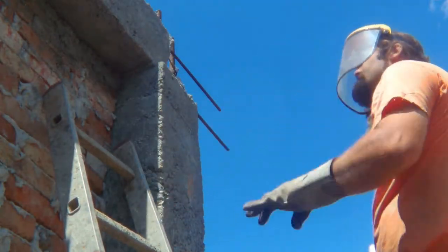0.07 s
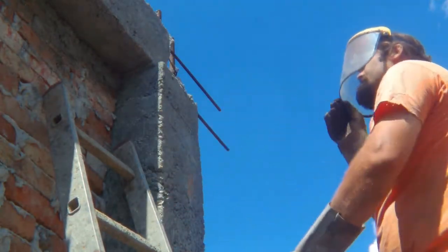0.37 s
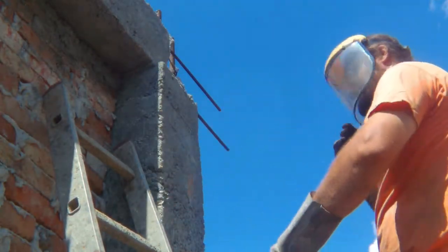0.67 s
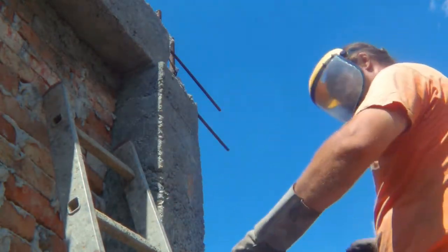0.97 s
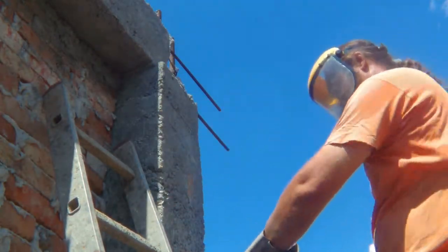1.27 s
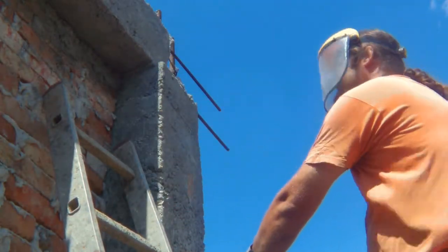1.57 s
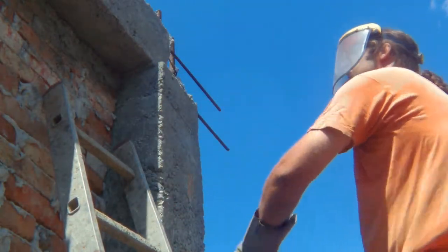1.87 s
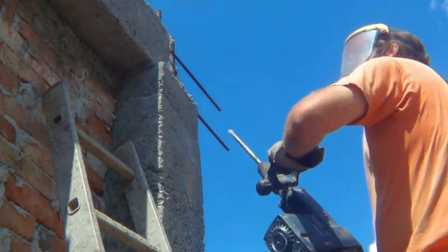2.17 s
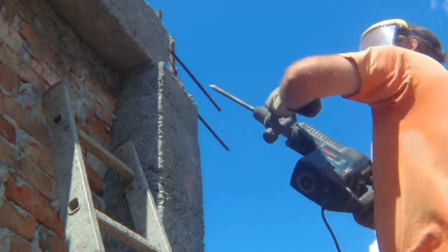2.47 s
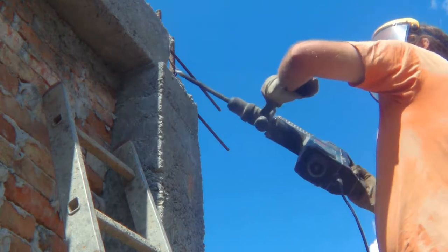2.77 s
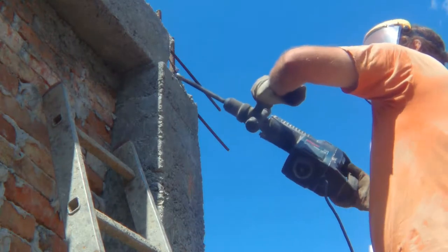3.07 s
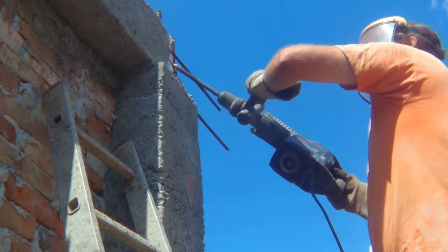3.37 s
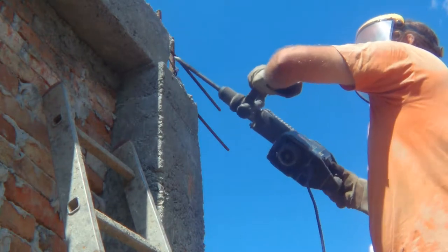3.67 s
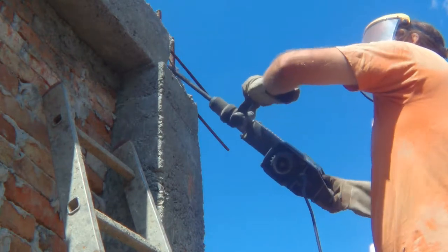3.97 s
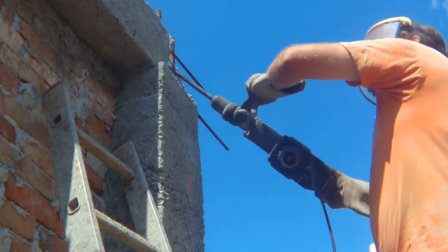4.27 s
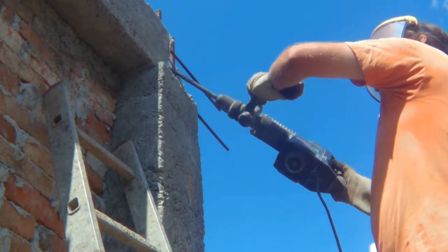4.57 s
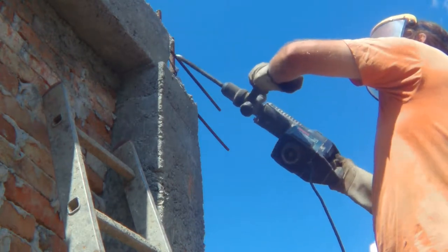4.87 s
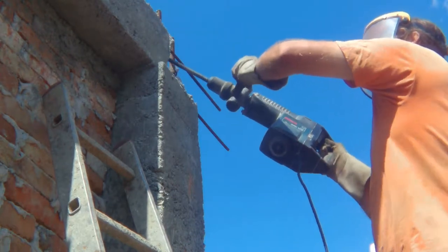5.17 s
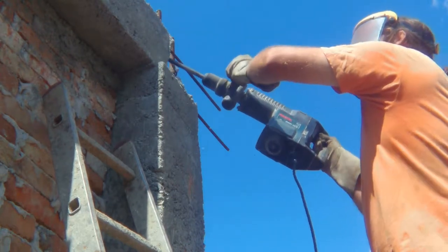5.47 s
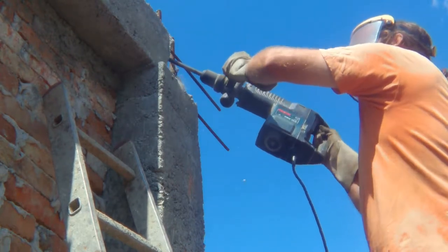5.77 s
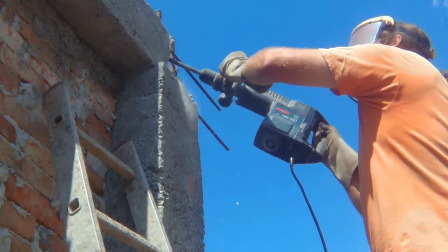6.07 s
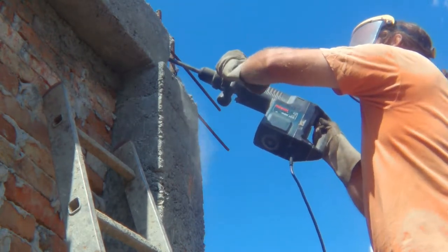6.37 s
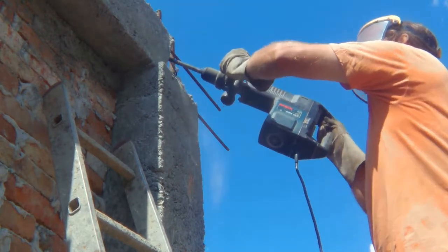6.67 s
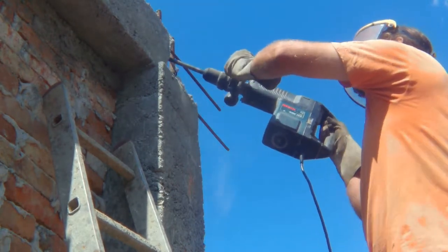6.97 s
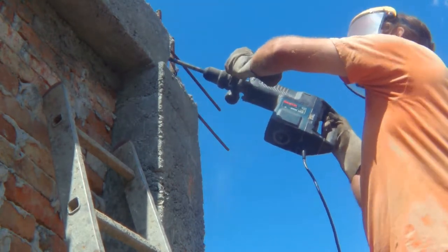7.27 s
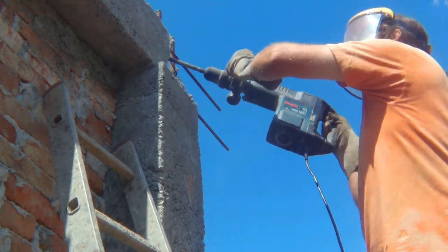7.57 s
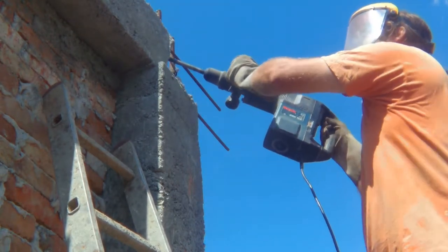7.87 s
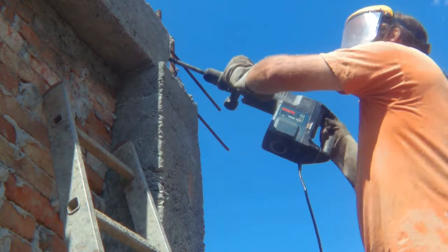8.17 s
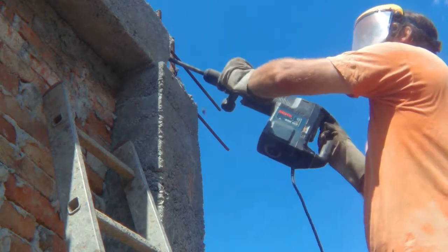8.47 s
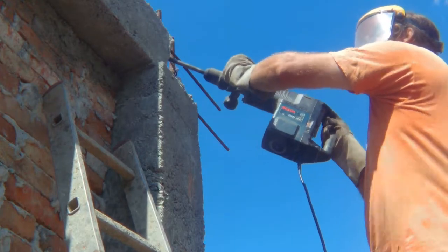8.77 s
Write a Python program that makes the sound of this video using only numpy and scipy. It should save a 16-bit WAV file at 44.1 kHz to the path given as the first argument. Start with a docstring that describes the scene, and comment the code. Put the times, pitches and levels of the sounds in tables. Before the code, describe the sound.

Outdoors, a faint distant machine hums and small birds chirp softly. Clothing rustles and a heavy tool gives hollow knocks and light clinks as it is lifted into place. An electric demolition hammer then runs up with a gear whine and pounds concrete in loud, stuttering bouts that slap off nearby walls. It goes on whirring with a few taps and a last steel skid, heard close and centred.

```python
"""An electric demolition hammer pounds a concrete lintel, worked from a scaffold.
Cloth rustles and the tool knocks and clinks as it is lifted and set. The motor runs up, gears whining,
and the striker hits the chisel in bouts, about 32 blows a second; then the tool idles with a few taps.
Nearby walls throw the blows back and a gain control ducks under them.
Behind it all, a far machine hums and small birds chirp in the open air."""
import sys
import numpy as np
from scipy import signal
from scipy.io import wavfile
from scipy.ndimage import uniform_filter1d

SR = 44100
rng = np.random.default_rng(int(sys.argv[2]) if len(sys.argv) > 2 else 0)


def inscribe(sig):
    """Save sig as 16-bit PCM at rate SR to the path in sys.argv[1].

    A 1-D sig is mono; a 2-D sig holds one channel per row.
    Samples are clipped to [-1, 1] before scaling.
    """
    pcm = np.round(np.clip(np.atleast_2d(sig).T, -1, 1) * 32767)
    wavfile.write(sys.argv[1], SR, pcm.astype(np.int16))


N = 393813
TIME = np.arange(N) / SR
MOTOR_START_S, SHAFT_TOP_HZ = 4.525, 274.0
PINION_TEETH, CRANK_TEETH = 7, 60


def amp(db):
    """Decibels to gain."""
    return 10 ** (np.asarray(db) / 20)


def unit_rms(x):
    """Scales to rms 1."""
    return x / np.sqrt(np.mean(x ** 2) + 1e-20)


def unit_peak(x):
    """Scales to peak 1."""
    return x / (abs(x).max() + 1e-20)


def add(mix, start_s, sound):
    """Mixes a sound in at a time."""
    part = mix[round(start_s * SR):][:len(sound)]
    part += sound[:len(part)]


def colour(x, curve, size=4096):
    """Minimum-phase EQ along a curve of (frequency [Hz], gain [dB])."""
    hz, db = np.transpose(curve)
    bins_hz = abs(np.fft.fftfreq(size, 1 / SR))
    log_gain = np.log(amp(np.interp(np.log(bins_hz + 1), np.log(hz), db)))
    taps = np.fft.ifft(np.exp(np.conj(signal.hilbert(log_gain)))).real[:size // 2]
    return signal.oaconvolve(x, taps)[:len(x)]


def drift(per_s):
    """Smooth random modulation of rms 1."""
    knots = np.arange(int(TIME[-1] * per_s) + 2)
    return unit_rms(np.interp(TIME * per_s, knots, rng.standard_normal(len(knots))))


def noise(curve, grain_db=0):
    """Coloured noise of rms 1, roughened by an optional level modulation."""
    return unit_rms(colour(rng.standard_normal(N) * amp(grain_db), curve))


def ring(t, hz, t60):
    """One dying mode."""
    return np.sin(2 * np.pi * hz * t) * np.exp(-np.log(1000) * t / t60)


def ring_modes(t, modes):
    """A set of modes struck together."""
    return sum(amp(db) * ring(t, hz, t60) for hz, db, t60 in modes)


def burst(t, swell_s):
    """A cluster of tiny contacts that swells and dies away."""
    return rng.standard_normal(len(t)) * t / swell_s * np.exp(1 - t / swell_s)


def reverb(x, wet_db, t60, reflections=600):
    """Adds the scattered reflections of scaffold and walls."""
    t = np.arange(SR // 2) / SR
    taps = np.zeros(len(t))
    taps[rng.integers(SR // 200, len(t), reflections)] = rng.choice([-1., 1.], reflections)
    taps *= np.exp(-np.log(1000) * t / t60)
    return x + amp(wet_db) * signal.oaconvolve(x, taps / np.linalg.norm(taps))[:N]


# dark outdoor bed: (frequency [Hz], gain [dB])
OPEN_AIR_EQ = [(15, -41), (25, -3), (44, -7.5), (257, -6.5), (318, -5), (344, -11.5), (438, -10.5),
               (475, -7.5), (515, -12.5), (621, -4), (769, -9), (879, -16), (952, -13.5), (1420, -22.5),
               (15000, -45.5)]
def open_air(level_db=-53.5):
    """A soft, gently breathing wash of outdoor air."""
    return noise(OPEN_AIR_EQ) * amp(level_db + 0.5 * drift(5.13))


# partials of the distant drone: (frequency [Hz], level [dB])
FAR_PARTIALS = [(316.5, -58.5), (473.7, -61), (631, -74), (790, -62), (947.5, -65.5)]
def far_machine():
    """A far machine hums, its partials wavering in pitch together."""
    clock = np.cumsum(1 + 0.00301 * drift(4.6)) / SR
    return sum(amp(db + drift(4.24)) * np.sin(2 * np.pi * hz * clock) for hz, db in FAR_PARTIALS)


# bird calls: (time [s], level [dB], pitch [Hz])
BIRD_CUES = [(.55, -70, 4670), (.86, -70, 4270), (1.72, -68, 4600), (1.79, -69, 4300), (2.06, -70, 4650),
             (2.45, -66, 4700), (3.09, -62, 4570), (3.79, -67, 4670), (3.91, -69, 6400)]
def birds(chirp_s=0.053, glide=0.03, roughness=0.2):
    """Small birds give faint, breathy chirps that glide up or down."""
    out = np.zeros(N)
    progress = np.arange(0, 1, 1 / (chirp_s * SR))
    for start, db, hz in BIRD_CUES:
        bend = glide * rng.standard_normal() * (.5 - progress)
        pitch = hz * (1 + bend + roughness * rng.standard_normal(len(progress)))
        tone = np.sin(2 * np.pi * np.cumsum(pitch) / SR)
        add(out, start, amp(db) * np.sin(np.pi * progress) * tone)
    return out


# the worker lifts the tool, then sets it: (time [s], length [s], level [dB])
MOVE_CUES = [(1.57, 1.76, -51), (3.812, 0.93, -50)]
# muffled cloth: (frequency [Hz], gain [dB])
CLOTH_EQ = [(15, -26.5), (50, 12.5), (90, -19.5), (250, -5.5), (450, 3), (680, 6), (900, -2), (1400, -16),
            (2300, -17), (3200, -24.5), (7500, -29.5), (10000, -42), (15000, -38)]
def rustle(ramp_s=0.12, grain_db=2.0):
    """Clothes and gloves rub in uneven patches during each move."""
    envelope = sum(amp(db) * np.clip(np.minimum(TIME - start, start + length - TIME) / ramp_s, 0, 1)
                   for start, length, db in MOVE_CUES)
    return envelope * noise(CLOTH_EQ, grain_db * drift(70))


# handling bumps before the start, louder taps in the gearbox rattle while idling:
# (time [s], level [dB], pitch [Hz], brightness [dB], contact time [s])
KNOCK_CUES = [(1.6225, -18.5, 685, -2, 0.00045), (1.6255, -21, 660, -4.5, 0.0029),
              (1.640, -26.5, 379, 3, 0.0037), (1.795, -41, 675, 5, .0018), (1.914, -32, 656, 13, 0.016),
              (1.932, -28, 686, -9, 0.0066), (2.1037, -25, 633, 2, 0.002), (2.402, -34, 530, 5, 0.008),
              (2.432, -38, 720, 3, 0.01), (2.474, -39, 560, 2, 0.0071), (2.698, -38.5, 640, -14, 0.0025),
              (2.870, -31, 687, 13, 0.0055), (2.886, -34.5, 730, 4, 0.0094), (3.046, -34, 666, -8, 0.011),
              (3.070, -28.5, 687, -7, 0.007), (3.3635, -23.5, 636, -6.5, 0.0035),
              (3.919, -35.5, 675, -5, 0.0011), (3.9423, -23.5, 780, 0, 0.0029),
              (4.063, -34, 720, -20, 0.0013), (4.313, -26, 690, -4.5, 0.0045),
              (4.391, -33.5, 630, -5, 0.0022), (4.4427, -5, 650, 7, 0.0038),
              (7.8325, -8.5, 710, -10, 0.0013), (8.0855, -7, 720, -8, 0.00082),
              (8.400, -16, 720, -11, 0.0018)]
# boxy scuff of each knock: (frequency [Hz], gain [dB])
SCUFF_EQ = [(100, -41), (230, -23), (350, -10.5), (450, -9.5), (600, 11.5), (950, 6.5), (1250, -2),
            (1500, -5.5), (1750, -9.5), (2300, -11), (3000, -22.5), (5000, -33.5), (7800, -35), (9000, -58),
            (15000, -54)]
def knocks(scuff_db=-3, shell_db=-5, shell_ratio=2.115):
    """Short hollow knocks, each with a scuff; hard ones ring an overtone of the tool's shell."""
    t, out = np.arange(SR // 3) / SR, np.zeros(N)
    for start, db, hz, bright_db, contact_s in KNOCK_CUES:
        hollow = ring(t, hz * .92, 0.023 + 6 * contact_s) + ring(t, hz * 1.09, 0.021 + 6 * contact_s)
        hollow = unit_peak(hollow * (1 - np.exp(-t / contact_s)))
        scuff = amp(scuff_db + bright_db) * unit_peak(colour(burst(t, contact_s), SCUFF_EQ))
        hardness = np.exp(-contact_s / 0.0021)
        shell = hardness * amp(shell_db + min(bright_db, 0)) * ring(t, hz * shell_ratio, t60=0.024)
        add(out, start, amp(db) * unit_peak(hollow + shell + scuff))
    return reverb(out, wet_db=-8.5, t60=0.24)


# low end of a footstep: (time [s], level [dB], pitch [Hz], t60 [s])
PLANK_CUES = [(1.657, -30.5, 59.4, 0.21), (1.662, -36.5, 41, 0.27)]
def plank():
    """The scaffold plank gives under a step with a deep thud."""
    t, out = np.arange(SR // 3) / SR, np.zeros(N)
    for start, db, hz, t60 in PLANK_CUES:
        add(out, start, amp(db) * ring(t, hz, t60))
    return out


# ring of the free chisel, in clinks and skids: (frequency [Hz], level [dB], t60 [s])
CHISEL_MODES = [(1540, -23, .04), (1860, -20, .035), (2317, -12, .035), (2590, -22, .03), (4440, -30, 0.05),
                (5550, -26, .035), (6580, -27, .04)]
# the chisel shifts: (time [s], clink level [dB], scrape level [dB], scrape swell [s])
CLINK_CUES = [(1.912, -40, -53, 0.024), (2.869, -34, -55.5, 0.011)]
# thin steel scrape: (frequency [Hz], gain [dB])
SCRAPE_EQ = [(800, -29), (2200, 4), (3000, -14), (4300, -3), (7700, -4.5), (8600, -12), (15000, -25)]
def clinks(scrape_trim_db=-0.5):
    """The loose chisel clinks and scrapes in its holder."""
    t, out = np.arange(SR // 3) / SR, np.zeros(N)
    steel = ring_modes(t, CHISEL_MODES)
    for start, clink_db, scrape_db, swell_s in CLINK_CUES:
        scrape = colour(burst(t, swell_s), SCRAPE_EQ)
        add(out, start, amp(clink_db) * steel + amp(scrape_db + scrape_trim_db) * scrape)
    return out


# start-up growl: (frequency [Hz], gain [dB])
SURGE_EQ = [(100, -56), (330, -13), (550, -4.5), (720, 7.5), (850, -0.5), (1100, -13), (2100, -33),
            (3300, -35), (4000, -37), (4250, -24), (4700, -54), (12000, -61)]
def surge(age, level_db=-22.5, peak_s=0.1, width_s=0.11):
    """The starting torque grinds the gears and sparks the brushes."""
    return noise(SURGE_EQ) * amp(level_db) * np.exp(-((age - peak_s) / width_s) ** 2)


# gear and fan partials: (frequency [x shaft speed], level [dB])
WHINE_PARTIALS = [(7, -35), (14, -44.5), (14.77, -66), (17, -47.5)]
# what the housing lets through: (frequency [Hz], gain [dB])
HOUSING_EQ = [(600, -23), (1200, -2.5), (1600, -4.5), (1900, 2), (2400, 6.5), (2900, -4), (4100, -0.5),
              (4800, -17), (9000, -28)]
def gear_whine(shaft_phase, pace, load, backlash_rad=0.14, chatter_rad=.6, strain=4.0):
    """The gears whine, roughened by play between the teeth, hardest while speeding up the piston."""
    play = backlash_rad + chatter_rad * (1 - pace)
    whine = sum(amp(db + 0.79 * drift(40)) * np.sin(multiple * shaft_phase + play * drift(400))
                for multiple, db in WHINE_PARTIALS)
    return colour(whine * load, HOUSING_EQ) * (1 + strain * pace * (1 - pace)) * pace


def crank_noise(turns, repeat_share):
    """Loose parts and tooth flaws: noise of which a share comes round on every crank turn."""
    flaws = rng.standard_normal(SR // 32)
    looped = flaws[(turns % 1 * len(flaws)).astype(int)]
    return np.sqrt(repeat_share) * looped + np.sqrt(1 - repeat_share) * rng.standard_normal(N)


# midrange gearbox rattle: (frequency [Hz], gain [dB])
RATTLE_EQ = [(12, -50), (30, -13.5), (90, -33), (150, -21), (220, -24.5), (290, -13), (360, -16),
             (460, -2.5), (600, -1), (780, 3), (850, 1), (940, -6.5), (1150, -15), (1600, -19.5),
             (3000, -56.5)]
# biting gear rasp: (frequency [Hz], gain [dB])
RASP_EQ = [(700, -47), (1200, -13.5), (1700, -2.5), (1900, 5), (2200, 2), (2620, -1), (2850, -9),
           (3550, -10.5), (3720, -9), (4040, -1), (4370, -3.5), (4600, -14), (5500, -24), (9000, -29.5),
           (13800, -40), (15500, -53)]
def gear_noise(turns, pace, load, throb_db, rattle_db=-21, rasp_db=-30.5, grain_db=1.5):
    """The gearbox rattles and the teeth rasp, growing with speed and throbbing with the crank."""
    running = pace > 0
    rattle = crank_noise(turns, repeat_share=0.23) * amp(throb_db + grain_db * drift(500))
    rattle = colour(running * rattle, RATTLE_EQ)
    rasp = crank_noise(turns, repeat_share=0.32) * load * amp(grain_db * drift(400))
    rasp = colour(running * rasp, RASP_EQ)
    return (rattle / rattle[running].std() * amp(rattle_db) * pace ** 1.5
            + rasp / rasp[running].std() * amp(rasp_db) * pace ** 1.54)


# bright fan hiss: (frequency [Hz], gain [dB])
FAN_EQ = [(2500, -6), (4800, -1.5), (5400, -1.5), (6000, -4), (6600, -1.5), (7100, 3), (7800, -0.5),
          (8400, -6.5), (9500, -13), (12000, -9), (12700, -33), (14200, -77), (15500, -56)]
def fan(pace, dip_db, level_db=-39.5):
    """Fluttering fan air rises steeply with speed."""
    air = noise(FAN_EQ, 0.66 * dip_db + 0.9 * drift(300) + 0.5 * drift(5))
    return air / air[pace > 0].std() * amp(level_db) * pace ** 3.5


# low motor tones: (frequency [x shaft speed], level [dB])
HUM_PARTIALS = [(0.1168, -55), (1, -41), (1.817, -36.5), (2, -32.5), (2.63, -31.5), (4, -39)]
def motor_hum(shaft_phase, pace):
    """Low tones follow the shaft and fill in as it nears full speed."""
    return pace ** 4 * sum(amp(db + 1.6 * drift(13)) * np.sin(multiple * shaft_phase)
                           for multiple, db in HUM_PARTIALS)


# the piston's two strokes: (position [turns], width [turns], gear boost [dB], rattle boost [dB])
PISTON_STROKES = [(0.66, 0.14, 4.5, 1.5), (.09, 0.13, 1, 3.5)]
# the gear rasp, whine and fan thin out while the striker works: (time [s], level [dB])
MOTOR_DIP = [(5.55, 1), (5.9, -2.5), (6.25, -5.5), (6.64, -7.5), (6.72, 0)]
def motor(run_up_s=.53, waver=0.0008, sag=0.013):
    """The motor runs up, fast at first, to its governed speed; the piston loads it twice a turn."""
    age = np.maximum(TIME - MOTOR_START_S, 0)
    pace = np.minimum(age / run_up_s, 1) ** .55  # share of full speed
    shaft_hz = SHAFT_TOP_HZ * pace * (1 + waver * drift(12))
    turns = np.cumsum(shaft_hz) / SR * PINION_TEETH / CRANK_TEETH
    turns -= np.interp(BOUT_CUES[-1][0], TIME, turns)  # the last blow ends a crank turn
    ripple = sag * (np.cos(2 * np.pi * turns) + np.cos(4 * np.pi * turns + 1))
    shaft_phase = 2 * np.pi * np.cumsum(shaft_hz * (1 + ripple)) / SR
    gear_db, throb_db = np.zeros((2, N))
    for position, width, gear_boost, rattle_boost in PISTON_STROKES:
        offset = (turns - position + .5) % 1 - .5
        stroke = np.exp(-(offset / width) ** 2)
        gear_db += gear_boost * stroke
        throb_db += rattle_boost * stroke
    dip_db = np.interp(TIME, *np.transpose(MOTOR_DIP))
    load = unit_rms(amp(gear_db)) * amp(dip_db)
    tones = motor_hum(shaft_phase, pace) + gear_whine(shaft_phase, pace, load)
    noises = gear_noise(turns, pace, load, throb_db) + fan(pace, dip_db) + surge(age)
    attack = np.minimum(age / 0.0059, 1)
    return attack * (tones + noises)


# whining peak near 2 kHz with hiss above it: (frequency [Hz], gain [dB])
ROUGH_WHINE_EQ = [(500, -47), (1500, -1), (2050, 6), (2600, -10), (3100, -15), (4200, -2), (5500, -21),
                  (6500, -8), (7600, 0), (8400, -10), (9300, -21), (11800, -24), (13000, -28), (15500, -50)]
def rough_whine(start_s=5.285, level_db=-26, rise_s=0.0072, fade_db_per_s=32, grain_db=3):
    """A rough gear whine with a gritty hiss, fading through the first blows."""
    age = np.maximum(TIME - start_s, 0)
    envelope = np.minimum(age / rise_s, 1) * amp(level_db - fade_db_per_s * age)
    return envelope * noise(ROUGH_WHINE_EQ, grain_db * drift(500))


# runs of blows: (time [s], length [s], level [dB], relative ping [dB], relative thud [dB])
BOUT_CUES = [(5.3016, .015, -6, -4, -7), (5.3324, .015, 5.5, -10, -31), (5.396, .015, 1, -13, 4),
             (5.4280, .047, 6, -16, -6), (5.514, .015, 5.5, -13.5, -12), (5.52, .015, -2.5, -9.5, -10),
             (5.585, .047, 8.5, -23, -15), (5.6464, .047, 6.5, -25.5, -19), (5.7064, .015, 3, -20, -9),
             (5.7596, .015, -10.5, -24, 11), (5.8005, .015, 11.5, -19.5, -23), (5.8325, .015, 6, -18, -13),
             (5.873, .015, 3.5, -29, -12), (5.918, .015, -6, -24, -15), (5.9603, .047, 9.5, -22, -32),
             (6.023, .047, 6, -24, -22), (6.0893, .015, 0.5, -29, -13), (6.1168, .047, 9, -25, -20),
             (6.178, .047, 5.5, -23.5, -12.5), (6.3031, .2, 8, -24, -23), (6.521, .015, 2, -21, -10),
             (6.5502, .015, 6, -20.5, -14), (6.617, .015, 6.5, -21.5, -15)]
def strikes(jitter_s=0.00028, fade_db_per_s=5, scatter_db=.5):
    """The striker catches in bouts: one blow a crank turn, fading slightly through each bout."""
    turn_s = CRANK_TEETH / PINION_TEETH / SHAFT_TOP_HZ
    for start, length, first_db, ping_db, thud_db in BOUT_CUES:
        for age in np.arange(0, length, turn_s):
            late, scatter = rng.standard_normal(2) * (age > 0)
            db = first_db - fade_db_per_s * age + scatter_db * scatter
            yield start + age + jitter_s * late, db, ping_db, thud_db


# body of a blow in chisel, housing and wall: (frequency [Hz], level [dB], t60 [s])
BODY_MODES = [(103.2, -32.5, 1), (218, -28, 0.15), (283, -30.5, 0.076), (418, -33, 0.082),
              (484.5, -20.5, 0.25), (629.5, -4, 0.059), (745, 2.3, .09), (922, -25, 0.093)]
# dull thud of a chisel not yet seated: (frequency [Hz], level [dB], t60 [s])
THUD_MODES = [(220, -12.5, 0.1), (360, -7.5, 0.018), (450, 10, 0.024)]
# EQ shaping the low end of each blow: (frequency [Hz], gain [dB])
LOW_END_EQ = [(30, -9.5), (75, -5.5), (102, -10.5), (135, 6.5), (180, -14.5), (220, -3.5), (260, 7),
              (330, -1), (1000, -5.5)]
# slap off the nearby walls: (delay [s], gain [linear])
WALL_ECHOES = [(.00469, .58), (.00687, -.29), (.01459, .28), (.01859, -.28), (.02221, -.24), (.02621, .34),
               (.03561, -.16), (.04544, -.14)]
def blows(trim_db=-2.5, rise_s=0.00071, detuning=0.0056):
    """The striker hits the chisel, tool and wall ring, and nearby walls throw the blow back."""
    t, thumps = np.arange(SR // 4) / SR, np.zeros(N)
    thud = unit_peak(ring_modes(t, THUD_MODES))
    for start, db, _, thud_db in strikes():
        modes = [(hz * (1 + detuning * rng.standard_normal()), level, t60)
                 for hz, level, t60 in BODY_MODES]
        body = unit_peak(ring_modes(t, modes)) + amp(thud_db) * thud
        add(thumps, start, amp(db + trim_db) * unit_peak(body * (1 - np.exp(-t / rise_s))))
    direct = colour(thumps, LOW_END_EQ)
    out = direct.copy()
    for delay, gain in WALL_ECHOES:
        add(out, delay, gain * direct)
    return reverb(out, wet_db=-17, t60=.16)


# steel attack of a blow: (frequency [Hz], gain [dB])
PING_EQ = [(100, -39), (1000, 10), (2200, 20.5), (2650, 11.5), (3000, -1), (4000, 4.5), (5200, -5),
           (6400, 2.5), (7600, 4.5), (8300, 1), (9200, -21), (11800, -8), (13000, -16), (15500, -46)]
def pings(trim_db=2, tip_db=-24, squeeze_db=-23, squeeze_hz=1990, lead_s=.016):
    """The gears whine as the piston squeezes its air cushion, then the steel pings and its tip rings."""
    t, out = np.arange(SR // 4) / SR, np.zeros(N)
    tip = amp(tip_db) * ring(t, hz=7740, t60=0.029)
    squeeze = np.exp(-((t - .009) / 0.0032) ** 2)
    for start, db, ping_db, _ in strikes():
        ping = unit_peak(colour(burst(t, swell_s=0.001), PING_EQ))
        add(out, start, amp(db + ping_db + trim_db) * (ping + tip))
        whine = np.sin(2 * np.pi * squeeze_hz * rng.uniform(0.94, 1.015) * t)
        add(out, start - lead_s, amp(min(db, 0) + squeeze_db) * squeeze * whine)
    return reverb(out, wet_db=-11, t60=.12)


# slips of the chisel: (time [s], level [dB], swell [s], low shelf [dB])
SKID_CUES = [(5.3301, 2, 0.0013, -2.5), (5.335, -12, 0.004, 4), (8.897, -3, 0.006, -14.5),
             (8.9, -6, 0.0027, -22)]
# harsh steel on concrete: (frequency [Hz], gain [dB])
SKID_EQ = [(60, -70), (400, -22), (1100, -14), (1530, 5.5), (1900, 10.5), (2330, 6), (2600, -1),
           (2850, -11), (4000, -8.5), (5000, -5), (5500, -16), (6000, -14), (7700, -10.5), (9200, -22),
           (11500, -19.5), (15000, -39), (15700, -74)]
def skids():
    """The chisel skids on concrete, which sets the free steel ringing."""
    t, out = np.arange(SR // 4) / SR, np.zeros(N)
    steel = ring_modes(t, CHISEL_MODES)
    for start, db, swell_s, shelf_db in SKID_CUES:
        skid = unit_peak(colour(burst(t, swell_s), SKID_EQ)) + steel
        add(out, start, amp(db) * colour(skid, [(1750, shelf_db), (2200, 0)]))
    return reverb(out, wet_db=-11, t60=.12)


# stereo width: (frequency [Hz], side relative to mid [dB])
SIDE_EQ = [(100, -89), (1500, -72), (2800, -46), (5500, -17), (8000, -19.5), (10000, 0.5), (13000, -20),
           (14500, 11), (15600, -41)]
def scene():
    """All sources sit in the centre; only the treble flutters between left and right."""
    ambience = open_air() + far_machine() + birds()
    foley = rustle() + knocks() + plank() + clinks()
    hammer = motor() + rough_whine() + blows() + pings() + skids()
    mid = ambience + foley + hammer
    side = colour(mid, SIDE_EQ) * drift(750)
    return np.array([mid + side, mid - side])


def record(dry, threshold_db=-12, slope=0.069, release_db_per_s=14, knee=0.6, cutoff_hz=15650):
    """Gain control ducks under the blows, the loudest peaks soft-clip and the extreme top is cut."""
    window = dict(size=200, origin=99)  # trailing average, in samples
    power_db = 10 * np.log10(abs(uniform_filter1d((dry ** 2).mean(0), **window)) + 1e-12)
    release_db = TIME * release_db_per_s
    held_db = np.maximum.accumulate(power_db + release_db) - release_db
    over_db = np.maximum(held_db - threshold_db, 0)
    ducked = dry / amp(slope * uniform_filter1d(over_db, **window))
    clean = np.clip(ducked, -knee, knee)
    rounded = clean + (1 - knee) * np.tanh((ducked - clean) / (1 - knee))
    lowpass = signal.firwin(511, cutoff_hz, window=("kaiser", 9), fs=SR)
    return signal.oaconvolve(rounded, lowpass[None], "same")


dry = scene()
out = record(dry)
inscribe(out)
```